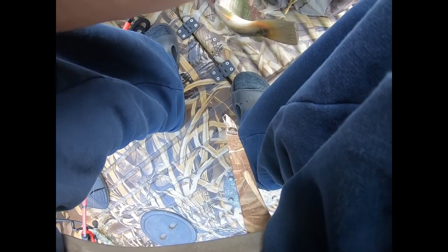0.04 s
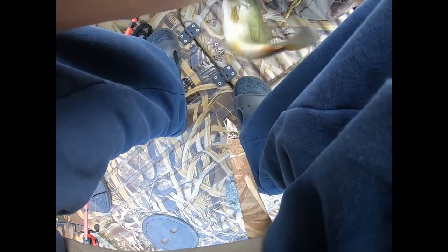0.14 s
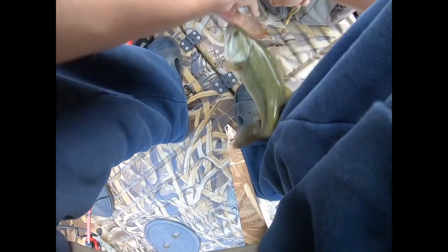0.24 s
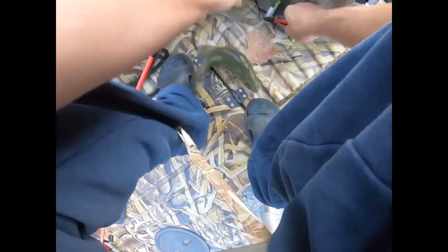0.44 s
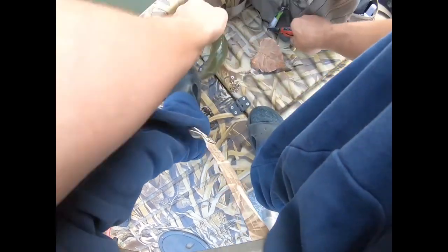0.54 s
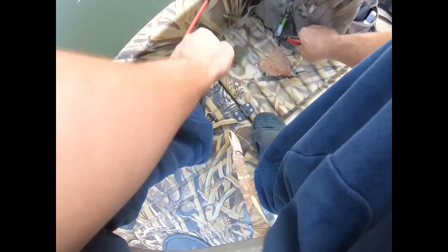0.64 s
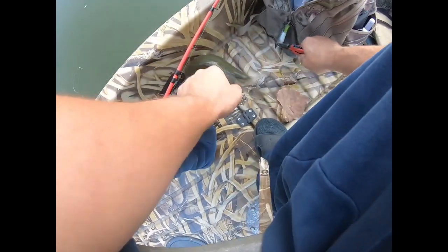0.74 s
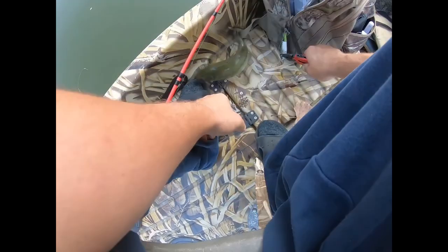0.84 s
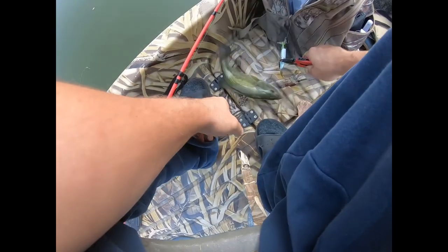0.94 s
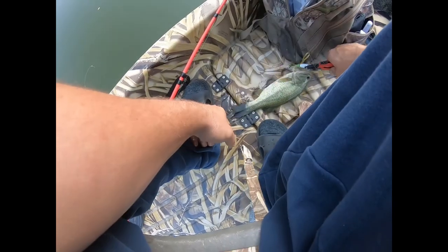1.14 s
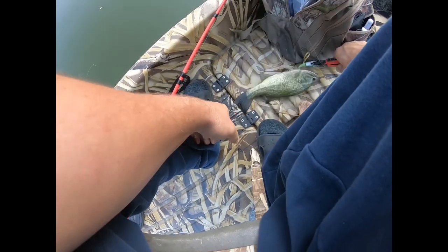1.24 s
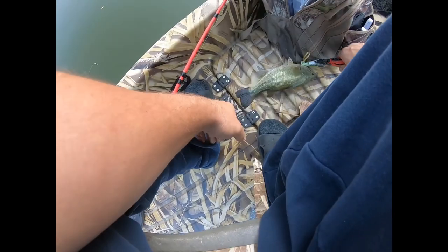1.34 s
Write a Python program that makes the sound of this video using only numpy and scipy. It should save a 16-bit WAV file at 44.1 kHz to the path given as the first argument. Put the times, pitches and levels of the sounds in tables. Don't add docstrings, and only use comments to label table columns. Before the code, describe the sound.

A small fish flops on a carpeted boat deck: light wet slaps and ticks at left, then hard hollow thumps in the middle, fading to scuffs over low hull rumble, close microphone.

```python
import sys
import numpy as np
from scipy import signal
from scipy.fft import rfft, irfft, next_fast_len
from scipy.io import wavfile
from scipy.ndimage import uniform_filter1d, map_coordinates

SR = 44100
rng = np.random.default_rng(int(sys.argv[2]) if len(sys.argv) > 2 else 0)


def makeup_ratio(level_db):
    decades = np.asarray(level_db, float) / 20
    return 10 ** decades


def to_wav(s):
    ch = np.atleast_2d(s).T
    pcm = np.round(np.clip(ch, -1, 1) * 32767)
    wavfile.write(sys.argv[1], SR, pcm.astype(np.int16))


N = 61739

# (time [s], peak level [dB], favoured pitch [Hz], brightness [dB])
THUMPS = [(0.37, -26, 212, 6.5), (0.515, -24.5, 104, 3), (0.5424, -6.5, 57.7, -1.5), (0.596, -18.5, 95, 3),
          (0.614, -10.5, 138, -6), (.624, -11, 107, 30.5), (0.647, -14, 200, 3), (0.664, -20, 210, 0.5),
          (0.6963, -7.5, 144, -0.5), (0.764, -16, 95, -5), (.800, -29.5, 95, -31),
          (0.886, -12.5, 151, -10.5), (0.925, -13.5, 119, -3.5), (.942, -14.5, 150, 0),
          (0.9639, -5, 170, -3), (0.995, -16, 128, -4.5), (1.044, -31, 203, 0), (1.119, -15, 95, -7.5),
          (1.1599, -5.5, 167, -1.5), (1.209, -22.5, 151, -1), (1.237, -24.5, 190, 0.5)]
# (time [s], peak level [dB], favoured pitch [Hz], brightness [dB])
LIFTS = [
    (.492, -18, 59, -23),
    (0.58, -18.5, 50, -16),
]
# (pitch [Hz], time to fall 60 dB [s], direction of first swing [+1 or -1])
DECK_MODES = [(52.3, 0.07, -1), (95, 0.12, 1), (127.8, 0.09, 1), (154.3, 0.053, -1), (203.2, 0.087, -1)]
# (pitch [Hz], level [dB], time to fall 60 dB [s])
PANEL_MODES = [(290.4, 2.5, 0.035), (347, 2, 0.043), (382.7, -8.5, 0.092), (474, -11.5, 0.048),
               (554, -24, 0.15)]
# (time [s], peak level [dB], length [ms], tilt [dB per octave])
SLAPS = [(.174, -26.5, 3, 0), (0.2101, -15.5, 2.1, -3.5), (0.214, -14, 4.4, -3),
         (0.226, -18, 4.5, 2.5), (0.286, -26, 21, 3.5), (0.322, -19, 11.5, 0.5),
         (.358, -20, 6.9, 5.5), (.367, -16.5, 3.3, -1), (.496, -20, 16.2, -4.5),
         (.510, -23, 3.9, -12), (0.541, -8, 2.6, -7.5), (0.544, -7.5, 1.73, 0.5),
         (0.577, -15, 10, -0.5), (0.5836, -16, 3.2, -1.5), (0.611, -19.5, 11.6, -7),
         (.622, -8.5, 6.2, -1.5), (.633, -12.5, 9.8, -8), (.6355, -13, 3.2, 2),
         (0.6388, -7.5, 3.2, 0.5), (.648, -15.5, 6.7, -4), (0.6569, -7.5, 2.35, 0.5),
         (.660, -14.5, 5.7, -7.5), (.665, -18, 4.3, 3), (.678, -16, 4.2, -0.5),
         (.6935, -18, 2.2, 3.5), (0.6952, 0, 0.87, -1), (0.706, -24, 3.4, 14), (0.727, -22, 11, 4.5),
         (0.78, -16, 1.14, -1), (0.833, -13.5, 2, 1.5), (0.839, -14.5, 16, 4.5), (.899, -28.5, 23, 0),
              (.916, -20, 13.7, -6), (.932, -13, 4.4, 1), (.9375, -5.5, 4.2, 1.5),
              (.943, -22.5, 9.4, -10.5), (0.9635, 3, 0.84, -7.5), (1.044, -30.5, 12, 1.5),
              (1.105, -40, 9.9, 0), (1.115, -22.5, 10, 0.5), (1.126, -23.5, 6.7, -6),
              (1.1475, -14.5, 3.5, 3), (1.151, -23, 6.9, -5.5), (1.1585, -11, 3.4, -7.5),
              (1.1705, -20.5, 2.1, -8), (1.190, -43.5, 5.1, 14), (1.208, -27.5, 7.4, -0.5),
              (1.224, -19.5, 3.9, 6), (1.2325, -20.5, 5.4, 2), (1.246, -17.5, 2.3, 4.5),
              (1.290, -25.5, 12, -1), (1.373, -25.5, 8.8, 6), (0.8851, -10.5, 3.4, -8.5),
              (1.002, -30, 8.5, -4), (1.025, -39, 2.9, 1), (1.266, -32, 13, 3), (1.317, -25.5, 3.7, -0.5),
              (1.324, -30, 3.1, 2), (1.395, -30, 3.2, 6)]
# (frequency [Hz], level per Hz [dB])
SKIN_COLOUR = [(250, -62.5), (600, -6), (1000, 0.5), (3400, -3.5), (7000, -9.5), (14000, -11)]
# (time [s], peak level [dB], pitch [Hz])
TICKS = [(0.2104, -13, 1660), (0.2895, -18, 2080), (0.3289, -7.5, 1870), (0.3393, -13.5, 1570),
         (0.511, -10.5, 3430), (.5405, -18, 3670), (0.5441, -2, 2160), (0.5826, -15, 3170),
         (0.751, -14.5, 2890), (0.7783, -10.5, 2920), (0.8041, -23, 2750), (0.832, -9, 2900),
         (.8343, -11, 3000), (.8545, -16.5, 3340), (.858, -18, 3300), (.8585, -16, 7500), (.872, -18, 3000),
         (0.8412, -5, 2760), (0.8504, -12, 3620), (0.8657, -17, 3540), (0.885, -5.5, 1284),
         (0.8984, -10.5, 2510), (0.9052, -2.5, 2560), (0.9369, -3.5, 3110), (1.0483, -13.5, 2920),
         (1.1587, -9, 1585), (1.2346, -14, 1655), (1.3493, -23.5, 1880), (.2165, 3.5, 9420),
         (.323, -13, 2690), (.2105, -13, 3560), (.219, -13, 3000), (.2255, -11.5, 8000), (.230, -7, 9400),
         (.293, -18, 1980), (.3245, -12.5, 7700), (.3325, -10.5, 1956), (.368, -4.5, 9220),
         (.6662, -5, 6830), (.679, -9.5, 7400), (.6965, 0, 10000), (1.383, -22.5, 1980),
         (.2115, -15.5, 1040), (.626, -16, 960), (.697, -8.5, 920), (.9638, -12, 2450), (1.1715, -19, 2000),
         (1.272, -27, 2120), (1.334, -29, 2920)]
# (time [s], left over right [dB])
FISH_PLACE = [(.2, 6), (.45, 4.5), (.55, 0.5), (1.05, -0.5), (1.4, 0)]
# (time [s], level [dB])
HULL_LEVEL = [(0, -36), (.5, -34.5), (.9, -35.5), (1.1, -36), (1.25, -39.5), (1.4, -41)]
# (frequency [Hz], level per Hz [dB])
HULL_COLOUR = [(12, -97), (20, -30), (97, -13.5), (262, -23), (328, -29.5), (700, -45), (910, -52),
               (1540, -120)]
# (pitch [Hz], level [dB], middle [s], half length [s])
HUMS = [
    (92.32, -32, 0, 0.37),
    (210.5, -36, 0.383, 0.14),
]
# (time [s], level [dB])
CLOTH_LEVEL = [(0, -54.5), (.2, -55), (.225, -32.5), (.3, -46.5), (.4, -36), (.46, -36), (.52, -41),
               (.56, -44.5), (.62, -33), (.7, -62), (.74, -45.5), (.82, -40), (.92, -43), (.98, -51),
               (1.09, -50), (1.22, -47.5), (1.4, -51)]
# (frequency [Hz], level per Hz [dB])
CLOTH_COLOUR = [(300, -42), (600, 0), (1200, -1), (2000, 0.5), (3700, -8), (7500, -11.5), (14000, -4.5)]
# (frequency [Hz], level per Hz [dB])
AIR_COLOUR = [(300, -20), (600, 0.5), (1200, -0.5), (1600, -14), (4000, -45), (7800, -42), (12000, -45)]
# (frequency [Hz], side under mid [dB])
STEREO_WIDTH = [(25, -7), (60, -18), (300, -15.5), (800, -3.5), (4000, -8.5), (9000, -0.5)]
# (frequency [Hz], level [dB])
MICROPHONE = [(500, 0.5), (650, -11), (800, -4), (8300, 3), (8900, -11), (9700, -5.5),
              (10700, -13), (11500, -20.5), (12500, -16.5), (14700, -21.5), (16400, -48)]


def unit(x):
    return x / np.sqrt(np.mean(x ** 2) + 1e-20)


def along(points, hz):
    f, v = np.transpose(points)
    return np.interp(np.log(hz + 1), np.log(f + 1), v)


def curve(rows):
    s, v = np.transpose(rows)
    return np.interp(np.arange(N) / SR, s, v)


def wobble(rate_hz, size=N):
    knots = rng.standard_normal(int(size * 2000 / SR) + 4)
    return map_coordinates(knots, [np.arange(size) * min(rate_hz, 1999) / SR])


def filtered(x, response):
    m = next_fast_len(x.shape[-1] + 8192)
    gain = response(np.fft.rfftfreq(m, 1 / SR))
    return irfft(rfft(x, m) * gain, m)[..., :x.shape[-1]]


def wide(count):
    noise = rng.standard_normal((2, count))
    mid, side = filtered(noise, lambda hz: makeup_ratio([0 * hz, along(STEREO_WIDTH, hz)]))
    return np.array([mid + side, mid - side])


def rush(colour):
    return unit(filtered(wide(N), lambda hz: makeup_ratio(along(colour, hz))))


def patchy(x, depth_db):
    z = signal.stft(x, nperseg=128)[2]
    field = uniform_filter1d(rng.standard_normal(z.shape[1:]), size=5, axis=0)
    field = uniform_filter1d(field, size=2, axis=1)
    return signal.istft(z * makeup_ratio(depth_db * unit(field)), nperseg=128)[1][:, :N]


def add(out, s, x):
    i = round(s * SR)
    out[..., i:i + x.shape[-1]] += x


def panned(x, s):
    pan_db = np.interp(s, *np.transpose(FISH_PLACE))
    return x * makeup_ratio(np.array([[pan_db / 2], [-pan_db / 2]]))


def deck_mode(t, hz, db, t60):
    level_db = db + 3.5 * rng.normal() - 60 * t / t60
    return makeup_ratio(level_db) * np.sin(2 * np.pi * hz * t) * (1 - np.exp(-t / 0.0017))


def thumps():
    contact_s, place_db = 0.001, 25
    out, t = np.zeros(N + SR), np.arange(SR // 3) / SR
    for push, (s, db, near_hz, bright_db) in [(1, row) for row in THUMPS] + [(-1, row) for row in LIFTS]:
        ring = 0
        for hz, t60, way in DECK_MODES:
            ring = ring + np.sign(way) * deck_mode(t, hz, -place_db * np.log2(hz / near_hz) ** 2, t60)
        for hz, level_db, t60 in PANEL_MODES:
            ring = ring - deck_mode(t, hz, level_db + bright_db, t60)
        press = np.hanning(max(round(contact_s * makeup_ratio(-.6 * bright_db) * SR), 3))
        blow = np.convolve(ring, press)[:len(t)]
        add(out, s, push * makeup_ratio(db - 5.5) * blow / np.abs(blow).max() * 2)
    return out[:N]


def slaps():
    release_s, release_grows = 0.0036, 0.94
    sag_db, rise_share = 3, 0.066
    grit_db, grit_hz = 2.5, 878
    out, t = np.zeros((2, N + SR)), np.arange(4096) / SR
    for s, db, length_ms, tilt_db in SLAPS:
        def colour(hz):
            return makeup_ratio(along(SKIN_COLOUR, hz) + tilt_db * np.log2((hz + 1) / 3000))
        noise = unit(filtered(wide(len(t)), colour))
        hold = max(length_ms, 1) / 1000
        rise = 1 - np.exp(-t / (rise_share * hold))
        sag = makeup_ratio(-sag_db * t / hold)
        let_go = np.exp(-np.clip(t - hold, 0, None) / (release_s * (hold / 0.007) ** release_grows))
        grit = makeup_ratio(db - 10.5 + grit_db * wobble(grit_hz, size=len(t)))
        add(out, s, panned(grit * rise * sag * let_go * noise, s))
    return patchy(out[:, :N], 3)


def ticks():
    out, t = np.zeros((2, N + SR)), np.arange(2048) / SR
    for s, db, hz in TICKS:
        two_ears = np.array([wobble(1550, size=len(t)), wobble(1850, size=len(t))])
        phase = 2 * np.pi * hz * t + 0.51 * two_ears + 0.76 * wobble(1176, size=len(t))
        cycles = 27.3 * (hz / 3000) ** 0.36
        fade = makeup_ratio(1.24 * wobble(980, size=len(t)) - 60 * t * hz / cycles)
        ring = np.sin(phase) * fade * (1 - np.exp(-t / 0.00023))
        add(out, s, panned(makeup_ratio(db - 6) * ring, s))
    return out[:, :N]


def boom(x):
    t60 = 0.076
    tail = wide(SR // 5) * makeup_ratio(-60 * np.arange(SR // 5) / SR / t60)
    return signal.fftconvolve(x, tail / np.linalg.norm(tail[0]), axes=1)[:, :N]


def cloth():
    level_db = curve(CLOTH_LEVEL) + 2.75 * wobble(40.84) + 0.37 * wobble(440)
    return makeup_ratio([[.8], [-.8]]) * makeup_ratio(level_db) * patchy(rush(CLOTH_COLOUR), 2.4)


def hull_rumble():
    return makeup_ratio(curve(HULL_LEVEL) + 1.63 * wobble(14.42)) * rush(HULL_COLOUR)


def panel_hums():
    t, hum = np.arange(N) / SR, np.zeros(N)
    for hz, db, middle_s, half_s in HUMS:
        swell = makeup_ratio(db + wobble(26.0)) * np.exp(-((t - middle_s) / half_s) ** 4)
        hum += swell * np.sin(2 * np.pi * hz * t + 0.12 * wobble(25.0))
    return hum


def river_air():
    follow_db = (curve(HULL_LEVEL) - curve(HULL_LEVEL)[0]) / 2
    return makeup_ratio(-49 + follow_db) * rush(AIR_COLOUR)


def gated(x):
    gate_hz, gate_db, follows, soft_db, leak_db = 9900, -70.5, 0.53, 2.5, -8
    hz, _, z = signal.stft(x, SR, nperseg=512)
    power = np.mean(np.abs(z) ** 2, axis=0) + 1e-16
    bands = power[:256].reshape(32, 8, -1).mean(axis=1)
    band_db = 10 * np.log10(np.repeat(bands, 8, axis=0))
    over_db = band_db - gate_db - follows * 10 * np.log10(power.sum(axis=0))
    closed = 1 / (1 + np.exp(np.clip(over_db / soft_db, -30, 30)))
    keep = np.where(hz[:256, None] > gate_hz, makeup_ratio(leak_db * closed), 1)
    return signal.istft(z[:, :257] * np.vstack([keep, keep[-1:]]), nperseg=512)[1][:, :N]


def scene():
    fish = makeup_ratio([[-.3], [.3]]) * thumps() + slaps() + ticks()
    return fish + makeup_ratio(-10) * boom(fish) + cloth() + hull_rumble() + panel_hums() + river_air()


def roll_off(x):
    return signal.sosfilt(signal.butter(12, 16470, fs=SR, output="sos"), x)


def record(dry):
    heard = filtered(dry, lambda hz: makeup_ratio(along(MICROPHONE, hz)))
    mix = gated(heard)
    return roll_off(mix)


dry = scene()
out = record(dry)
to_wav(out)
```